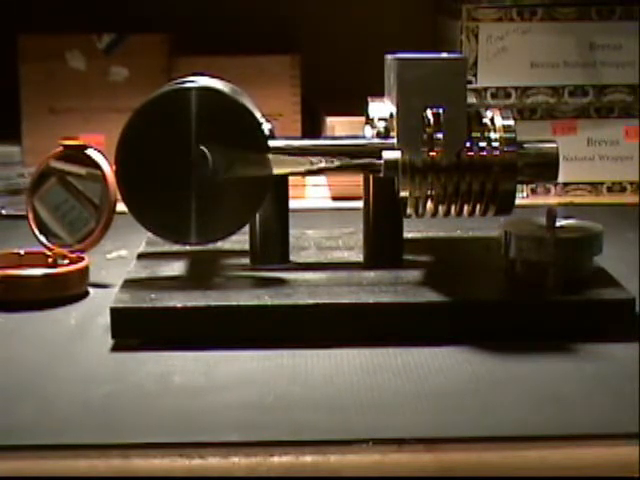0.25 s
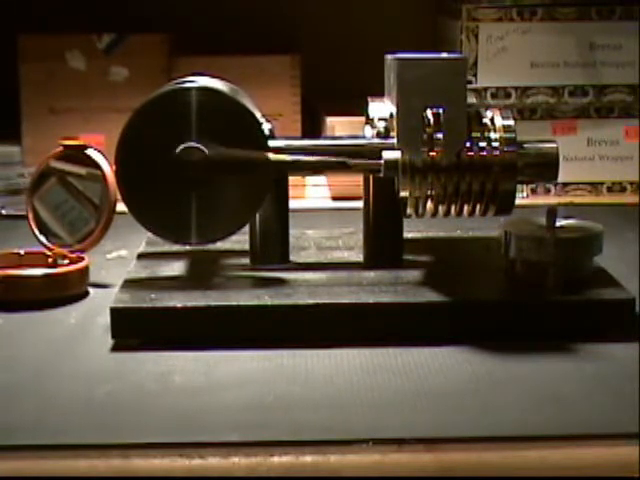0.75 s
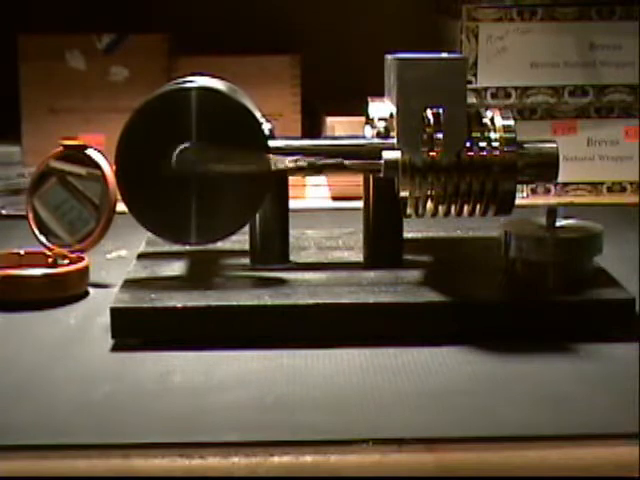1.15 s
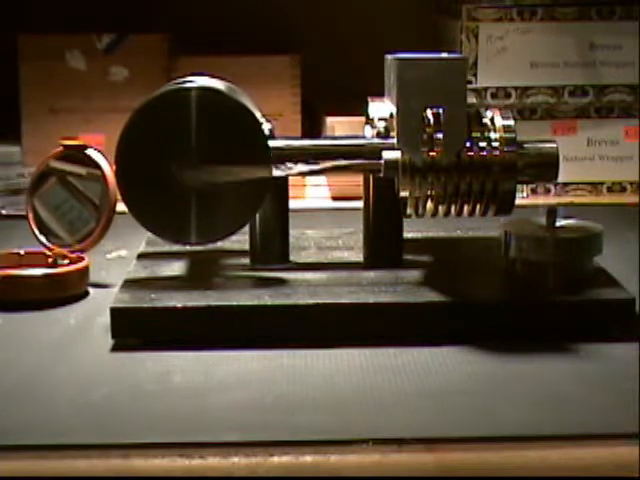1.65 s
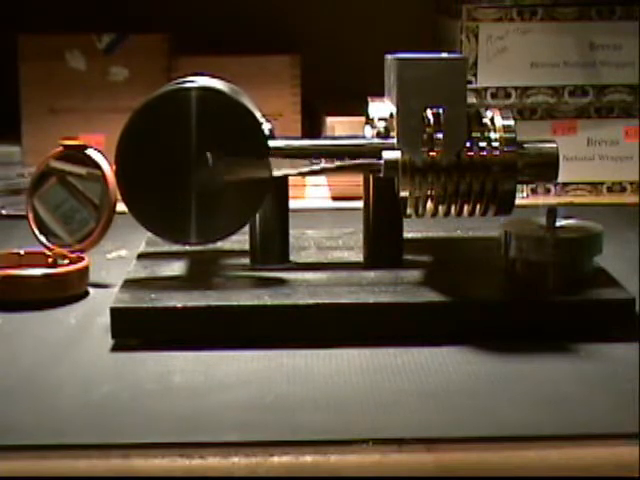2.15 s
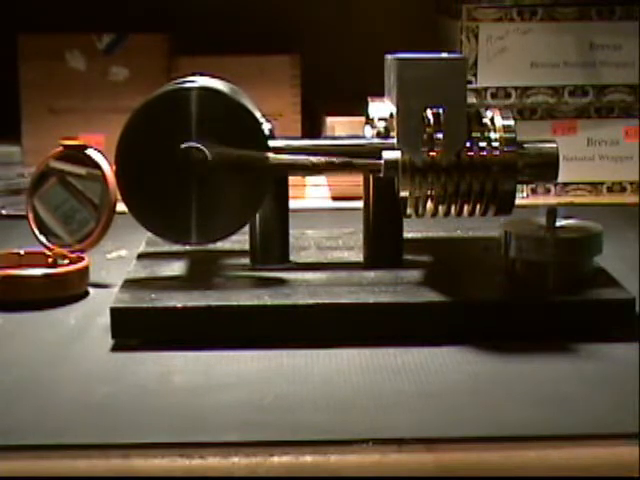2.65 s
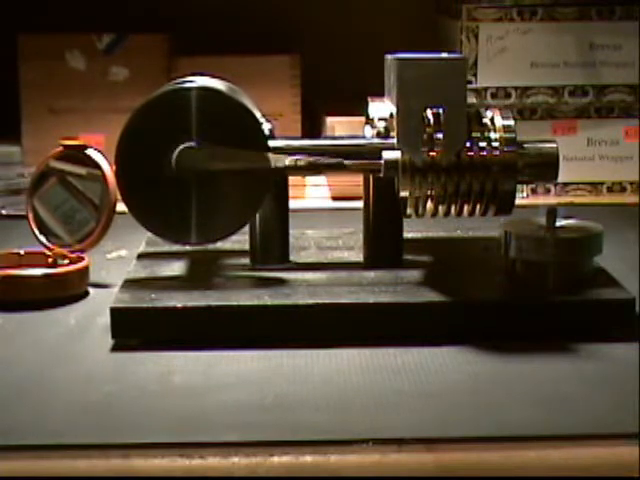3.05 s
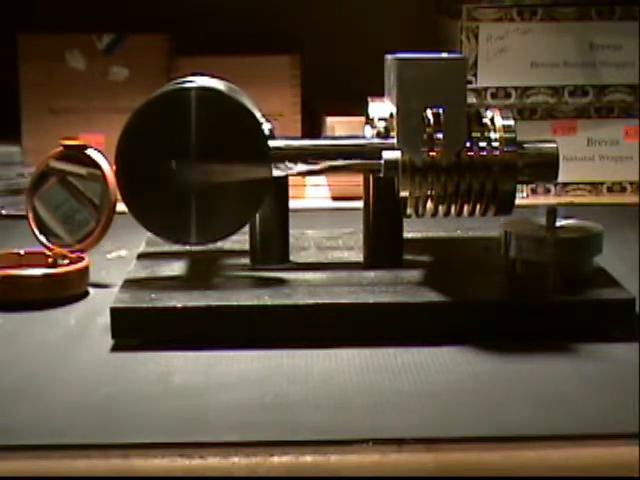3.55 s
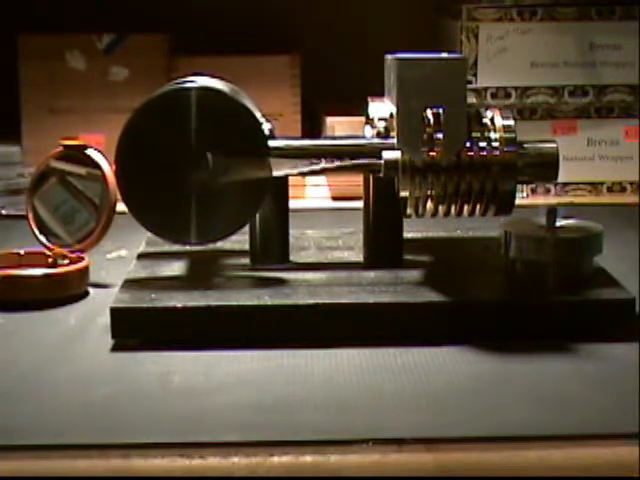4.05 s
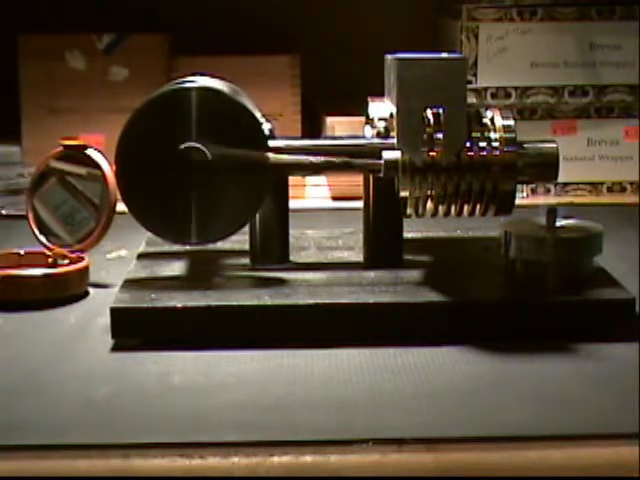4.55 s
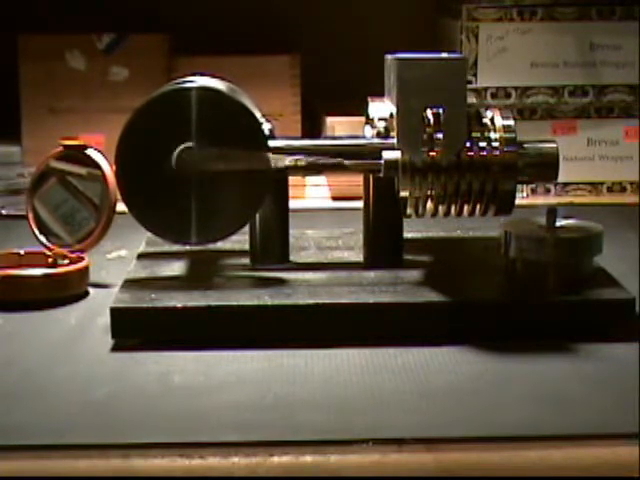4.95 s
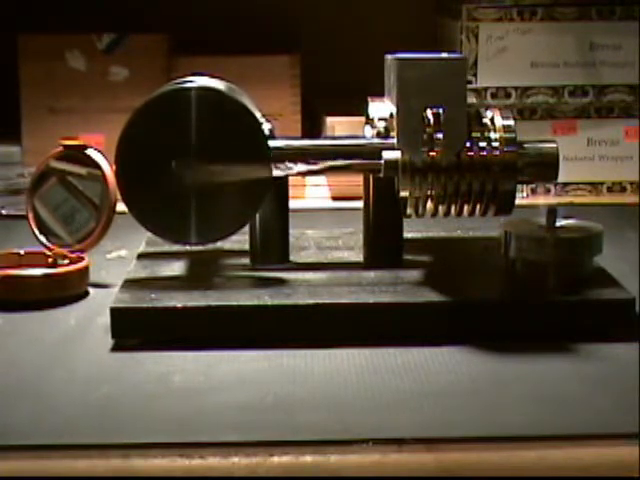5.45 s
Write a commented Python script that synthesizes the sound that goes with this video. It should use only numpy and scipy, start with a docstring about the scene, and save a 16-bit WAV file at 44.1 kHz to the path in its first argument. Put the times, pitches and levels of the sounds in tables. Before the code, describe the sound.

A small hot-air engine runs fast with a steady low hum, metallic rubbing, and bursts of high ticking, chatter and thin ringing.

```python
"""Small hot-air engine on a bench

The engine spins at about 19.5 turns a second. Each turn jolts the base into a low hum, beside a
faint steady drone. Sliding parts rub, and the rubbing noise makes the metal frame ring.
Slack (a little free play) in the linkage of rods and pins chatters and ticks in bursts,
and keeps the flywheel singing on one high note."""
import sys
import numpy as np
from scipy import signal
from scipy.fft import rfft, irfft, next_fast_len
from scipy.io import wavfile

SR = 44100
rng = np.random.default_rng(int(sys.argv[2]) if len(sys.argv) > 2 else 0)


def file_out(sig):
    """Save sig as 16-bit WAV at sys.argv[1]."""
    # one column per channel
    cols = np.atleast_2d(sig).T
    # limit, then scale
    lim = np.clip(cols, -1, 1)
    pcm = np.round(lim * 32767).astype(np.int16)
    wavfile.write(sys.argv[1], SR, pcm)


N = 251811
TIME = np.arange(N) / SR


def gain_of(db):
    """Turns decibels into a number to multiply a sound by."""
    return 10 ** (np.asarray(db) / 20)


def normalised(x):
    """Scales a signal to an average size (rms) of 1."""
    return x / np.sqrt(np.mean(x ** 2) + 1e-20)


def gain_at(table, hz):
    """The gain at any frequency, read between the rows of a (frequency, level) table."""
    row_hz, db = np.transpose(table)
    return gain_of(np.interp(np.log(hz + 1), np.log(row_hz + 1), db))


def filtered(x, gain):
    """Turns each frequency up or down by gain(hz)."""
    size = next_fast_len(N)
    return irfft(rfft(x, size) * gain(np.fft.rfftfreq(size, 1 / SR)), size)[..., :N]


def resonate(x, gain):
    """Filters so that ringing comes after each push, never before it (minimum phase)."""
    size = 2 * next_fast_len(N // 2 + 1)
    cepstrum = irfft(np.log(gain(np.fft.rfftfreq(size, 1 / SR)) + 1e-9), size)
    cepstrum[1:size // 2] *= 2
    cepstrum[size // 2 + 1:] = 0
    return irfft(rfft(x, size) * np.exp(rfft(cepstrum)), size)[:N]


def wander(rate_hz):
    """A smooth random wobble of average size 1; a higher rate wobbles faster."""
    return normalised(filtered(rng.standard_normal(N), lambda hz: 1 / (1 + (hz / rate_hz) ** 2)))


def drone(pitch_hz=56.3, level_db=-49):
    """A faint low tone that does not follow the crank."""
    level = gain_of(level_db + wander(2))
    return np.sqrt(2) * level * np.sin(2 * np.pi * pitch_hz * TIME + .3 * wander(2.5))


# How fast the crank spins: (time [s], speed [turns per second])
CRANK_SPEED = [(0, 19.50), (1, 19.52), (1.6, 19.48), (2.5, 19.48), (3.3, 19.45), (5.71, 19.445)]

def crank_angle(start_turns=.155):
    """How far the crank has turned, in radians; the jolt comes at each whole turn."""
    speed = np.interp(TIME, *np.transpose(CRANK_SPEED))
    return 2 * np.pi * (start_turns + np.cumsum(speed) / SR)


# The tones in the hum: (pitch [multiple of the crank speed], level [dB])
HUM_TONES = [(1, -70), (2, -72), (5, -95), (6, -51.5), (7, -38), (8, -51.5), (9, -49.5), (10, -48.5),
             (11, -113), (12, -58.5), (13, -72)]

def base_hum(angle):
    """One jolt a turn shakes the base into a set of slightly wavering tones."""
    hum = np.zeros(N)
    for multiple, db in HUM_TONES:
        level = gain_of(db + .81 * wander(.45))
        lag = .32 * (multiple - 8) ** 2  # tones far from the base's own pitch trail behind
        hum += level * np.cos(multiple * angle - lag + .099 * wander(1.4))
    return np.sqrt(2) * hum


# Notes at which the frame, cylinder and base ring: (pitch [Hz], width [Hz], level [dB])
FRAME_NOTES = [(153, 91, -63), (329.6, 17.5, -58.5), (415.3, 32.4, -61.5), (481.3, 14, -62),
               (533, 5.8, -59), (609, 21, -64), (742.2, 27.2, -49.5), (797, 16, -61), (1017, 32, -51),
               (1103, 40, -54), (1173, 32, -54), (950, 110, -66), (1480, 40, -62), (1631, 22, -61),
               (1701, 32, -63), (1845, 75, -55.5), (1900, 34, -50), (1985, 70, -54.5), (2065, 45, -56),
               (2115, 186, -58), (2224, 39, -54), (2255, 36, -56), (2640, 12, -75), (2622, 19.5, -58.5),
               (2700, 29, -65), (2900, 46, -66), (3079, 127, -64.5), (3195, 27, -62), (3657, 77, -59),
               (3778, 59, -67.5)]
# Finer notes of the cylinder, fins and flywheel: (pitch [Hz], width [Hz], level [dB])
FINE_NOTES = [(357, 22, -68), (1236, 27, -63), (2550, 22, -80), (3310, 20, -63), (3930, 46, -74),
              (3970, 26, -74.5), (4117, 14, -69.5), (4140, 16, -76), (4750, 126, -78), (5013, 75, -74),
              (5140, 33, -60), (5274, 21, -62.5), (5586, 30, -70), (5560, 52, -71), (6100, 43, -77),
              (6250, 33, -69), (6383, 73, -72), (7100, 20, -99), (9000, 40, -74), (10570, 480, -75.5)]
# The rubbing hiss between those notes: (frequency [Hz], level [dB])
RUB_HISS = [(15, -80), (40, -67), (90, -103), (250, -71), (700, -72.5), (1500, -68.5), (2500, -71.5),
            (3500, -77), (4400, -82), (7000, -85.5), (10500, -84.5), (12000, -100), (15000, -105)]

def frame_rubbing(angle):
    """Sliding parts make gritty noise, a bit stronger before each jolt, that rings the metal."""
    def metal_gain(hz):
        note_power = sum(gain_of(db) ** 2 / (1 + (2 * (hz - pitch) / width) ** 2) ** 1.9
                         for pitch, width, db in FRAME_NOTES + FINE_NOTES)
        return np.sqrt(note_power + gain_at(RUB_HISS, hz) ** 2)

    noise = rng.standard_normal(N)
    stroke_db = 1.11 * np.exp(np.cos(angle + .95) - 1)
    drift_db = .5 * wander(1.1)
    grit_db = 1.27 * wander(160)
    rub = normalised(noise * gain_of(stroke_db + drift_db + grit_db))
    return np.sqrt(SR / 2) * resonate(rub, metal_gain)


# Moments when the load holds the slack shut: (start [s], length [s])
RATTLE_PAUSES = [(0.236, .09), (.43, 0.05), (0.633, .05), (.83, 0.072), (1.123, .04), (1.249, 0.037),
                 (1.66, .09), (1.867, 0.052), (2.113, .07), (2.225, 0.19), (2.683, .05), (3.371, 0.086),
                 (4.12, 0.055), (4.333, 0.07), (4.5, 0.073), (5.187, 0.036), (5.51, .3)]

def rattle_db(times, open_db=-42, drop_db=14.5, edge_s=.0076):
    """How loud the slack rattles at the given times; it drops during each pause."""
    shut = sum(np.tanh((times - start) / edge_s) - np.tanh((times - start - length) / edge_s)
               for start, length in RATTLE_PAUSES) / 2
    return open_db - drop_db * shut


# The loudest swells of the flywheel's note: (start [s], length [s], level [dB])
RIM_SWELLS = [(0.049, 0.093, -35.5), (0.143, 0.047, -36.5), (0.314, 0.035, -41), (0.382, 0.069, -34.5),
              (0.546, 0.037, -36), (0.695, 0.049, -35.5), (0.767, 0.045, -33), (0.915, 0.089, -36),
              (1.03, 0.059, -35), (1.183, 0.035, -35), (1.239, 0.041, -38), (1.309, 0.039, -35),
              (1.362, 0.06, -30.5), (1.436, 0.039, -37), (1.58, 0.041, -35), (1.797, 0.035, -35),
              (2.093, 0.053, -38), (2.199, 0.026, -35), (2.489, 0.107, -32.5), (2.595, 0.053, -36),
              (2.821, 0.035, -38), (2.873, 0.086, -35), (3.031, 0.038, -38), (3.075, 0.045, -34),
              (3.207, 0.049, -33.5), (3.312, 0.055, -32.5), (3.517, 0.046, -31.5), (3.871, 0.057, -38),
              (3.981, 0.031, -36), (4.055, 0.042, -34), (4.197, 0.05, -37.5), (4.317, 0.037, -37),
              (4.412, 0.041, -37), (4.461, 0.035, -34.5), (4.591, 0.041, -37), (4.656, 0.087, -36),
              (4.777, 0.031, -37), (4.965, 0.077, -37), (5.058, 0.058, -37), (5.134, 0.086, -33.5),
              (5.401, 0.039, -38)]

def flywheel_singing(pitch_hz=5182, waver_hz=9.08, rise_s=.0023, fall_s=.0027, fall_early_s=.0067):
    """The rim rings on one wavering note, swelling out of a murmur that follows the rattle."""
    murmur_db = rattle_db(TIME) - 4.5 + 5.5 * wander(22)
    power = gain_of(murmur_db) ** 2
    for start, length, db in RIM_SWELLS:
        near = slice(max(round((start - .04) * SR), 0), round((start + length + .09) * SR))
        t = TIME[near] - start
        rise = 1 / (1 + np.exp(-t / rise_s))
        fall = 1 / (1 + np.exp((t - length + fall_early_s) / fall_s))
        power[near] += (gain_of(db) * rise * fall) ** 2
    flutter = gain_of(2 * wander(30))
    phase = 2 * np.pi * np.cumsum(pitch_hz + waver_hz * wander(25)) / SR
    return np.sqrt(2 * power) * flutter * np.sin(phase)


# Notes of the rods and pins: (pitch [Hz], relative level [dB], time to fade by 60 dB [s])
ROD_NOTES = [(5550, -27, .03), (7600, -28, .03), (8790, -24, .04), (9250, -22, .03), (9370, -19, .03),
             (9485, -8, .06), (9555, -4.5, .07), (9700, -20, .03), (10300, -21, .03), (10540, -20, .04),
             (10680, -17, .05), (10880, -19, .04), (11000, -22, .03)]

def rod_ringing(blows, spread_db, rise_s=.0015):
    """Each blow rings every note of the linkage with a random strength; close notes throb together."""
    t = np.arange(3500) / SR
    hits = np.flatnonzero(blows)
    luck = rng.standard_normal((len(hits), len(ROD_NOTES), 2))
    ringing = np.zeros(N)
    for k, (hz, db, fade_s) in enumerate(ROD_NOTES):
        pushes = np.zeros(N)
        pushes[hits] = blows[hits] * gain_of(spread_db * luck[:, k, 0]) * np.sign(luck[:, k, 1])
        level = gain_of(db - 60 * t / fade_s) * (1 - np.exp(-t / rise_s))
        ringing += signal.oaconvolve(pushes, level * np.sin(2 * np.pi * hz * t))[:N]
    return ringing


def noise_puff(blows, colour, fade_s):
    """A dying puff of noise after each blow; the colour table sets how bright it is."""
    power = signal.oaconvolve(blows ** 2, np.exp(-np.arange(3000) / SR / fade_s))[:N]
    noise = np.sqrt(abs(power)) * rng.standard_normal(N)
    return filtered(noise, lambda hz: gain_at(colour, hz))


# The short fizz after any blow in the linkage: (frequency [Hz], relative level [dB])
FIZZ_COLOUR = [(4300, -3), (5300, 17.5), (6300, 5.5), (7300, 5.5), (9000, 15), (10700, 13.5), (12000, 6),
               (14500, -16)]

def linkage_chatter(angle, blows_per_s=500):
    """Loose parts trade many tiny blows, which die down while the load holds the slack shut."""
    looseness = 1 - 1.1 * np.exp(4.4 * (np.cos(angle - 2.1) - 1))  # dips once a turn
    strength = gain_of(3.8 * np.minimum(rng.exponential(1, N), 3))
    blows = looseness * strength * (rng.random(N) < blows_per_s / SR)
    ringing = rod_ringing(blows, spread_db=5.2)
    fizz = gain_of(-22) * noise_puff(blows, FIZZ_COLOUR, fade_s=.008)
    return gain_of(rattle_db(TIME)) * normalised(ringing + fizz)


# Places in each turn where the slack may knock shut: (place after the jolt [turns], scatter [turns],
# chance [0-1], top strength above the rattle [dB], crack compared with strength [dB])
KNOCK_PLACES = [(0.561, .04, .7, 16.5, -18), (.85, .04, .6, 22, -30), (1.12, .05, .5, 15, -24)]

def lesser_ticks(angle, loud_times, spread_db=4, clear_s=.014):
    """Picks chance knocks of the slack, away from the loud ticks, as (time, strength, crack) rows."""
    place, scatter, chance, above_db, crack_db = np.transpose(KNOCK_PLACES)
    turns = angle / (2 * np.pi)
    whole_turns = np.arange(-1, turns[-1])[:, None]
    lateness, softness = rng.standard_normal((2, len(whole_turns), len(KNOCK_PLACES)))
    times = np.interp(whole_turns + place + scatter * lateness, turns, TIME, left=-1, right=-1)
    clear = abs(times[..., None] - loud_times).min(-1) > clear_s
    heard = (rng.random(times.shape) < chance) & clear & (times > 0)
    strength_db = rattle_db(times) + above_db - spread_db * abs(softness)
    return np.stack(np.broadcast_arrays(times, strength_db, crack_db), axis=-1)[heard]


# The loudest knocks of the slack: (time [s], strength [dB], crack compared with strength [dB])
LOUD_TICKS = [(0.0867, -22.5, -26), (0.1246, -26, -21), (0.1709, -17, -23), (0.1884, -16.5, -31),
              (0.3282, -27, -25), (0.3451, -20, -32), (0.383, -22, -24), (0.4783, -24, -25),
              (0.4963, -21.5, -31), (0.5394, -20, -27), (0.6955, -24.5, -21), (0.7603, -20.5, -23),
              (0.788, -22, -19.5), (0.9188, -26, -29), (0.944, -21.5, -21), (1.0478, -14.5, -24.5),
              (1.1667, -31, -21), (1.1927, -21.5, -21), (1.2232, -23, -31), (1.309, -17.5, -27),
              (1.3545, -19.5, -22), (1.4222, -21, -27), (1.4735, -21.5, -21), (1.5539, -27, -19),
              (1.6282, -22, -36), (1.7444, -35, -18), (1.7594, -26.5, -14), (1.8996, -27, -20),
              (1.9669, -15, -25), (1.9898, -21, -31), (2.1772, -16, -30), (2.4374, -22, -25),
              (2.4862, -23, -26), (2.5017, -20, -27), (2.534, -18, -26), (2.5482, -16, -24),
              (2.6358, -24, -22), (2.7342, -22, -19), (2.8205, -30, -16), (2.8679, -25, -22),
              (2.8946, -19, -20), (3.043, -23.5, -19), (3.1467, -19.5, -23), (3.2035, -20.5, -18),
              (3.2524, -20.5, -25), (3.3099, -14.5, -32), (3.4391, -25.5, -23), (3.5116, -22, -21),
              (3.5234, -17.5, -25), (3.6134, -23, -20), (3.6643, -23, -17), (3.7272, -22, -24),
              (3.766, -17, -23), (3.8167, -25, -19), (3.8698, -24.5, -14), (3.917, -27, -22),
              (3.9823, -18.5, -28), (4.1943, -20, -26), (4.2767, -23.5, -16), (4.3008, -24, -31),
              (4.4036, -28, -29), (4.456, -31, -28), (4.5703, -28, -30), (4.5955, -22, -27),
              (4.616, -22.5, -23), (4.6932, -16, -20.5), (4.795, -21.5, -20), (4.8518, -19, -25),
              (4.955, -18, -33), (5.0035, -19, -22), (5.0634, -21.5, -25), (5.227, -25.5, -27),
              (5.2679, -27, -25), (5.3413, -27, -27), (5.4086, -22, -21), (5.4656, -21, -18.5)]
# The sharp snap that starts a tick: (frequency [Hz], relative level [dB])
SNAP_COLOUR = [(3500, -30), (6000, 2), (10000, 25.5), (12500, 10), (14500, 2)]

def linkage_ticks(angle):
    """The slack knocks shut: the rods ring, with a crack of noise made of a snap and a fizz."""
    lesser = lesser_ticks(angle, loud_times=np.array(LOUD_TICKS)[:, 0])
    times, strength_db, crack_db = np.vstack([LOUD_TICKS, lesser]).T
    hits = np.round(times * SR).astype(int)
    blows, cracks = np.zeros((2, N))
    blows[hits] = gain_of(strength_db)
    cracks[hits] = gain_of(strength_db + crack_db)
    ringing = gain_of(2) * rod_ringing(blows, spread_db=1.7)
    snap = noise_puff(cracks, SNAP_COLOUR, fade_s=.001)
    fizz = noise_puff(cracks, FIZZ_COLOUR, fade_s=.014)
    return ringing + snap + fizz


# How the sound leans to one side: (frequency [Hz], left minus right [dB])
EAR_BALANCE = [(60, -1.7), (370, -1.6), (740, -2.8), (1200, -1.4), (2000, -1), (3250, -.5), (5200, 1.2),
               (8000, .1), (14500, 0)]
# The part of the bench echoes that the ears do not share: (frequency [Hz], relative level [dB])
ECHO_COLOUR = [(25, -5), (60, -6), (130, -10), (250, -17), (700, -21), (1500, -24), (4500, -16),
               (9000, -21), (13000, -20)]

def scene():
    """The whole engine in stereo; echoes off the bench reach each ear a little differently."""
    angle = crank_angle()
    bright = flywheel_singing() + linkage_ticks(angle) + linkage_chatter(angle)
    engine = drone() + base_hum(angle) + frame_rubbing(angle) + bright
    bounces = rng.standard_normal(1500) * np.exp(-np.arange(1500) / 400)
    echoes = signal.oaconvolve(bright, bounces / np.linalg.norm(bounces))[:N]
    echoes += frame_rubbing(angle)  # fresh noise stands in for the rubbing's echo
    unshared = filtered(echoes, lambda hz: gain_at(ECHO_COLOUR, hz))
    left = filtered(engine, lambda hz: gain_at(EAR_BALANCE, hz) ** .5) + unshared
    right = filtered(engine, lambda hz: gain_at(EAR_BALANCE, hz) ** -.5) - unshared
    return np.array([left, right])


def record(dry):
    """Cuts away the highest treble, above 14600 Hz."""
    low_pass = signal.firwin(161, 14600, window=("kaiser", 9), fs=SR)
    return signal.oaconvolve(dry, low_pass[None], "same")


dry = scene()
out = record(dry)
file_out(out)
```